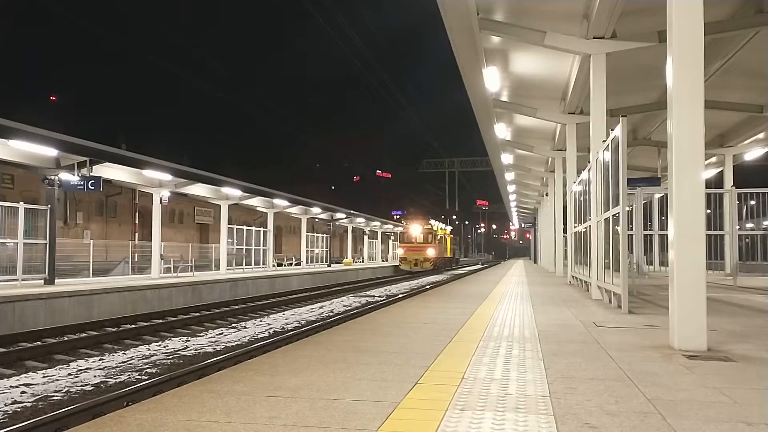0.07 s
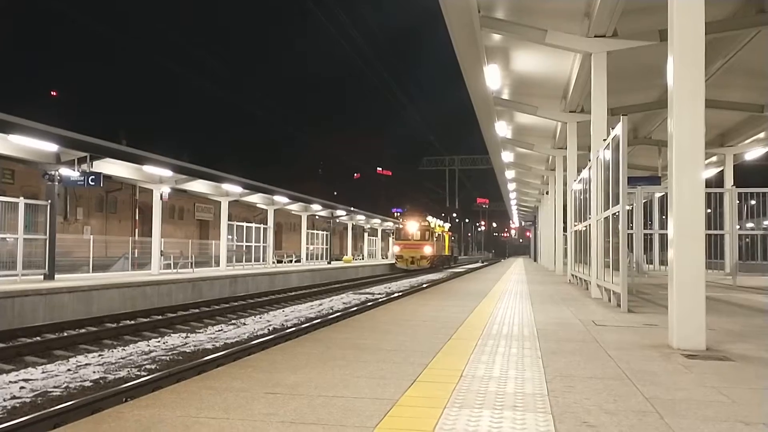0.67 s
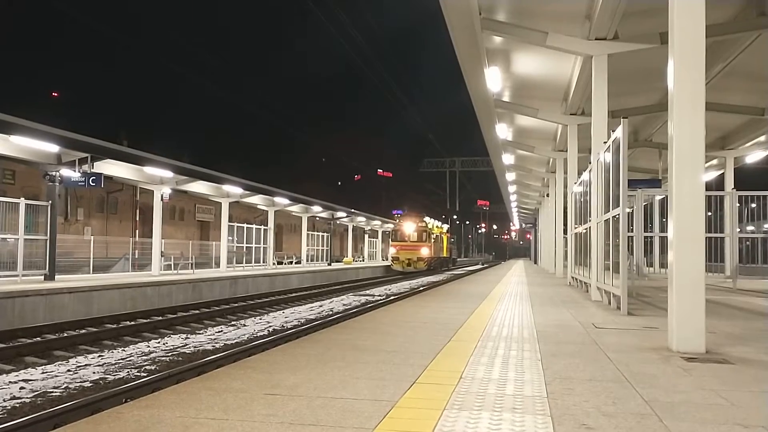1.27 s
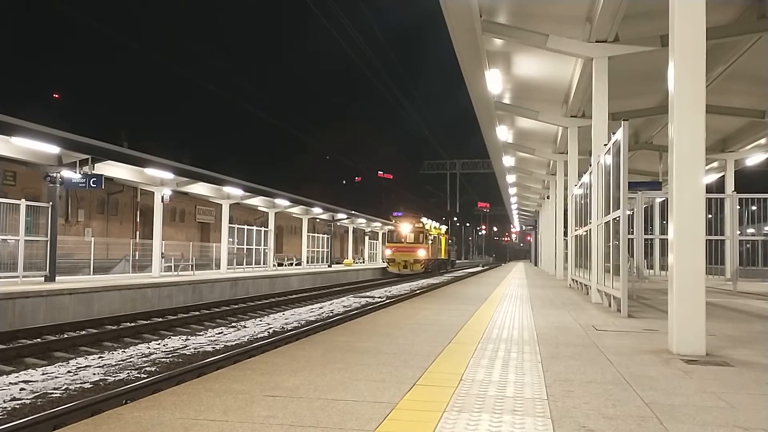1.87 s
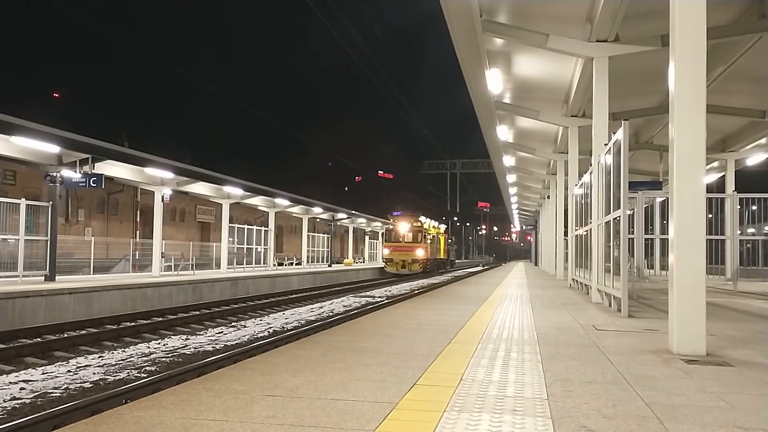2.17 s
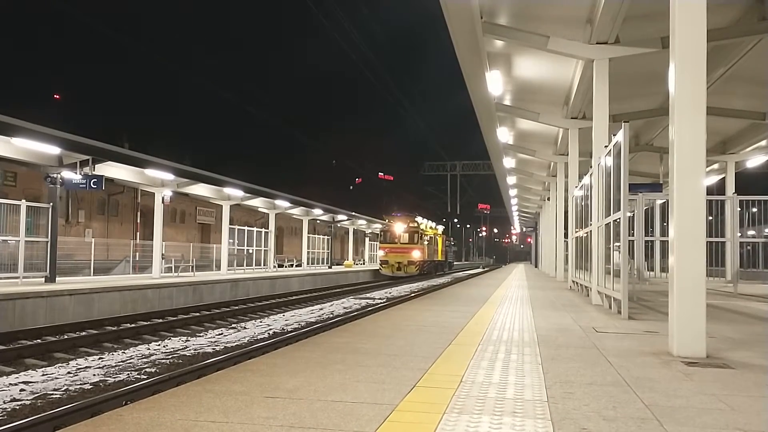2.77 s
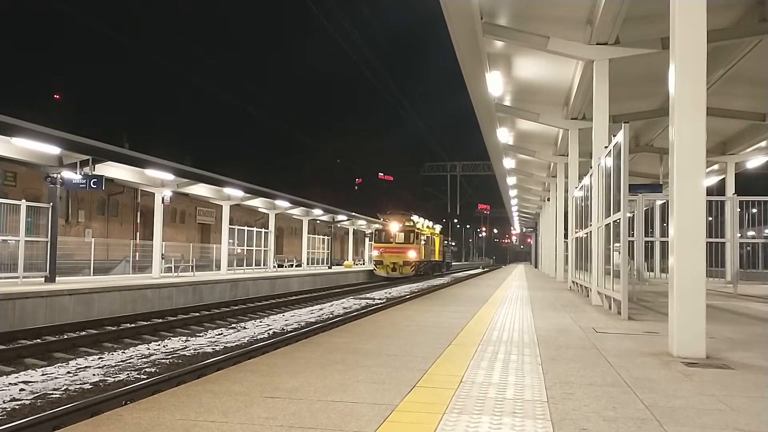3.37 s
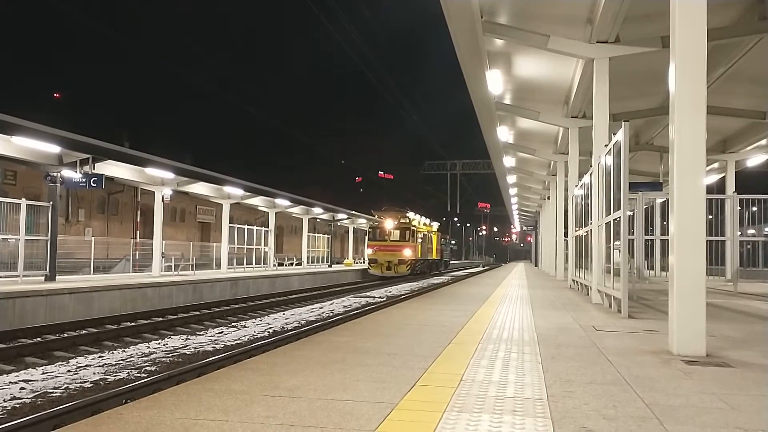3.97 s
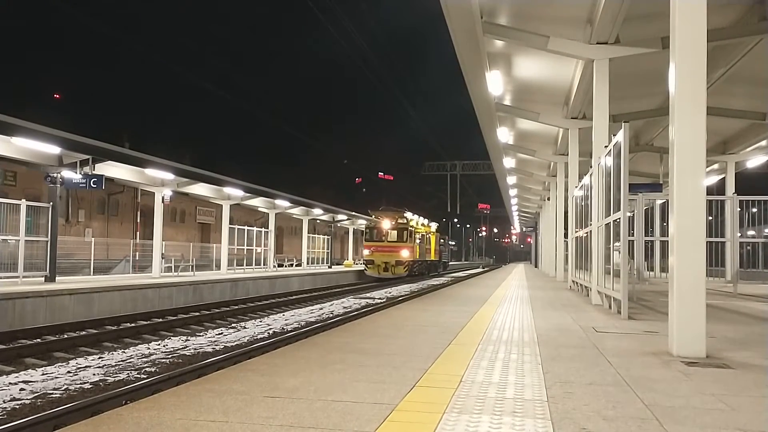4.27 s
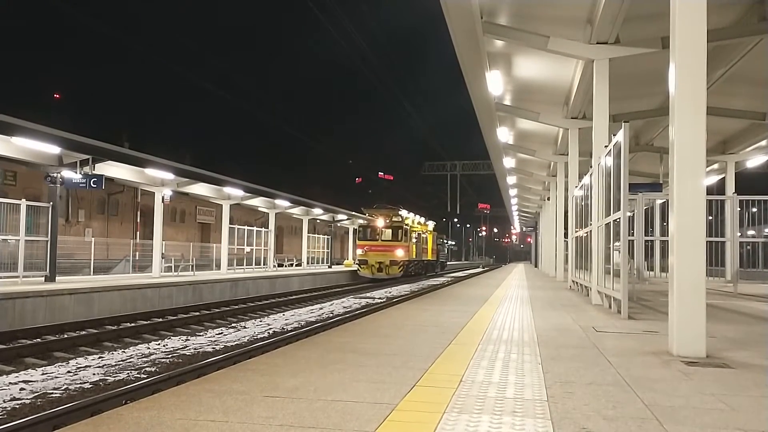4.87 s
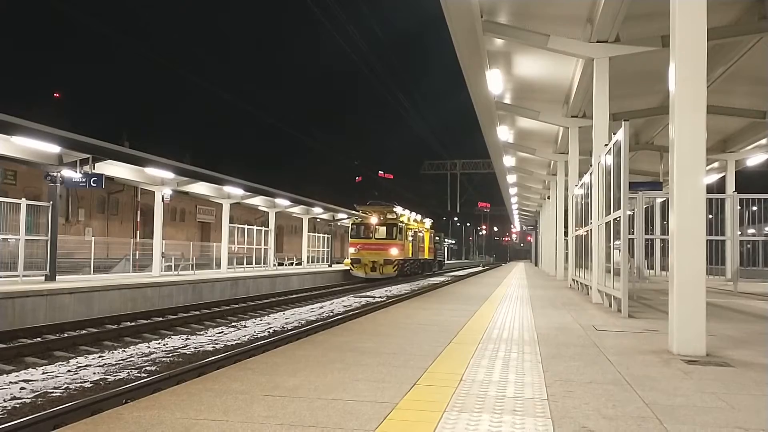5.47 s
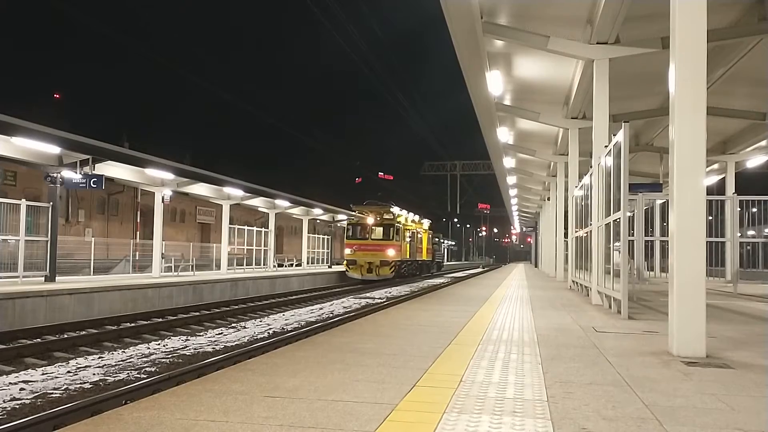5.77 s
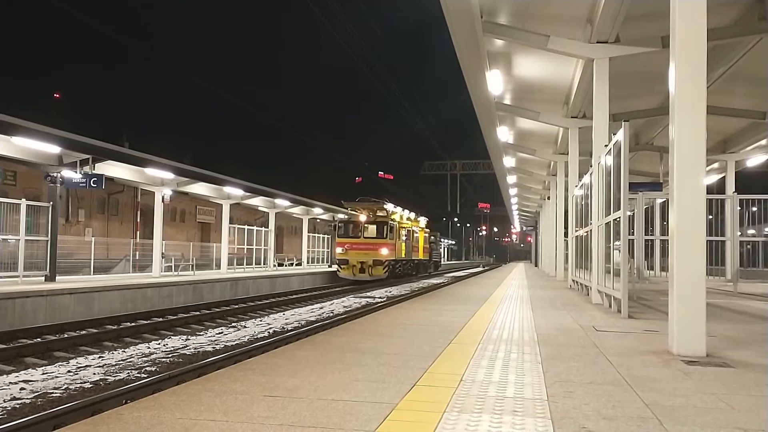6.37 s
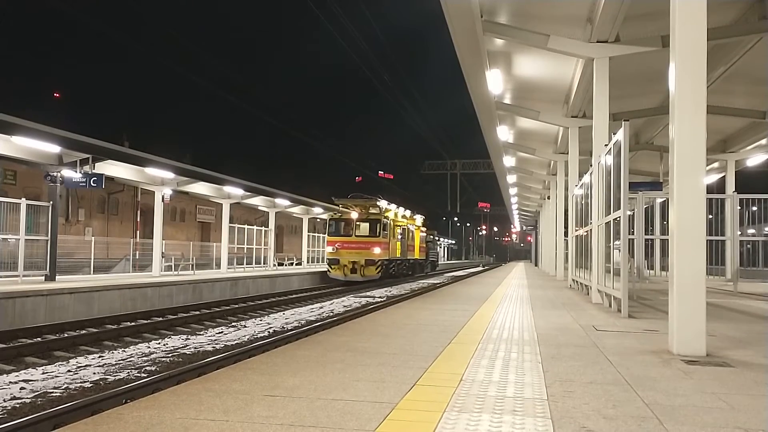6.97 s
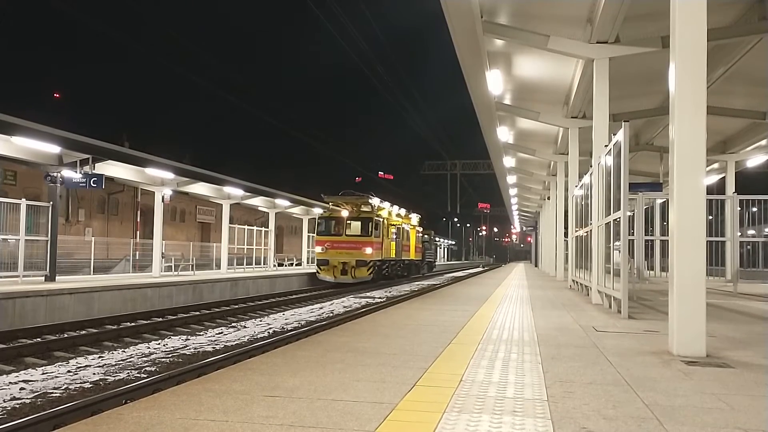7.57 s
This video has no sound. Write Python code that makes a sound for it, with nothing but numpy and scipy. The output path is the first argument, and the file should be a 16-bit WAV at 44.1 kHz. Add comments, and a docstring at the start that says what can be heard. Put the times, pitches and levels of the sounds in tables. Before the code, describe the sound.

From a roofed station platform, a diesel rail maintenance vehicle is heard approaching with a low, pulsing hum and rumble. The engine works harder for about two seconds, with small clanks from the running gear, then coasts while faint swishes and spits of hiss come and go. Past halfway, a loud hiss of released air builds and slowly drains away over the continuing throb. The bass is centred and the hiss spreads wide.

```python
"""A station platform at night: a diesel track maintenance vehicle rolls closer, pulling, then coasting.
Its engine beats against a second, slower machine in a deep throb, over rumble, clatter and exhaust drone.
The running gear knocks, and faint swishes and spits of hiss come and go. Then a valve lets out
a long jet of air that swells as it opens and sinks as the reservoir drains, under the platform roof."""
import sys
import numpy as np
from scipy import signal
from scipy.fft import rfft, irfft, next_fast_len
from scipy.io import wavfile
from scipy.ndimage import map_coordinates

SR = 44100
rng = np.random.default_rng(int(sys.argv[2]) if len(sys.argv) > 2 else 0)


def output_pcm(signal):
    """Save a mono or channel-first signal as 16-bit PCM at the path in sys.argv[1].

    Samples are clipped to [-1, 1] before scaling.
    """
    pcm = np.clip(np.atleast_2d(signal).T, -1, 1) * 32767
    wavfile.write(sys.argv[1], SR, np.round(pcm).astype(np.int16))


N = 340011

# The two deep hums; a negative echo turns the fade into a swell:
# (coasting level [dB], pull boost [dB], echo gain [ratio], fade time [s], fade period [s])
ENGINE_HUM = (-51, 10.5, 1.06, 1.47, 5)
AUXILIARY_HUM = (-50, 9, -0.14, 3.2, 5.5)
# Singing engine overtones: (multiple of the firing rate [ratio], then the five columns of a hum)
SINGING_TONES = [(6, -59, 6.6, 0.51, 3.51, 2.8), (7, -61.5, 11.2, 0.39, 1.61, 0.84)]
# Growl of the engine and the second machine: (multiple of its hum [ratio], relative level [dB])
ENGINE_OVERTONES = [(2, -8.5), (5, -17.5), (9, -15), (10, -15), (11, -18), (13, -21), (14, -21),
                    (16, -22.5)]
AUXILIARY_OVERTONES = [(2, -11), (2.5, -17), (4, -16.5)]
# Fader curve of the exhaust drone: (time [s], relative level [dB])
EXHAUST_FADER = [(0.32, -56), (0.4, -45.5), (0.85, -33.5), (1.36, -39), (1.5, -34.5), (1.79, -41),
                 (1.93, -36.5), (2.83, -59), (3.3, -46.5), (3.41, -64), (3.47, -49.5), (3.73, -48),
                 (3.88, -58.5), (4.2, -42.5), (5.12, -41), (6.39, -45.5), (6.55, -50.5), (7.66, -37.5)]
# Clanks of the running gear: (time [s], level [dB], ring [Hz])
GEAR_KNOCKS = [(1.122, -43, 2700), (1.231, -41.5, 2550), (1.402, -42, 2250), (1.475, -54, 2700),
               (7.315, -48, 2600)]
# Soft swells of hiss: (time [s], relative level [dB], half width [s])
HISS_SWELLS = [(.48, -63.5, .05), (1.043, -50, 0.078), (1.14, -46, 0.052), (1.36, -59, .05),
               (1.54, -61, 0.083), (2.035, -53, .055), (2.36, -64, 0.15), (2.73, -61.5, 0.047),
               (2.95, -64.5, 0.066), (3.34, -67.5, 0.048), (4.14, -66.5, .055), (4.48, -69.5, .05)]
# Spits of hiss: (time [s], relative level [dB], fall [s], low cut [Hz], high cut [Hz], pan left [dB])
HISS_SPITS = [(1.233, -39.5, 0.0058, 1500, 16000, -5), (1.365, -42, .002, 4000, 7000, 1),
              (1.403, -49.5, 0.011, 1200, 16000, -8), (1.665, -39.5, 0.0083, 2860, 12000, -4),
              (1.688, -50, .002, 4000, 14000, -1), (1.880, -45, 0.015, 6460, 16000, -8),
              (2.018, -31, 0.0015, 5000, 16000, -3), (2.864, -47.5, .011, 6960, 16000, -3),
              (3.014, -54, .017, 3000, 13000, -3), (3.233, -46, .008, 7000, 12500, 0),
              (3.251, -39, 0.0092, 5900, 11000, -3), (3.254, -48, 0.014, 2200, 5000, 3),
              (4.395, -61, .004, 4000, 14000, -6)]
# Tone colour of each noise layer: (frequency [Hz], relative level [dB])
RUMBLE_EQ = [(20, -36), (40, -15), (60, 0.5), (85, -3.5), (135, 0), (190, -1.5), (255, -4), (320, -1.5),
             (390, -4.5), (490, -9.5), (620, -7.5), (900, -29), (1500, -47)]
CLATTER_EQ = [(300, -11), (600, -6), (820, 0.5), (1150, -6.5), (1430, -2.5), (1620, -5), (1830, -4),
              (2150, -12), (2700, -14.5), (3300, -22.5), (5000, -28), (8000, -36), (16000, -56)]
JET_EQ = [(500, -28), (1000, -9.5), (1700, -3), (2300, -4.5), (2900, -0.5), (3500, -3.5), (4600, -3),
          (5800, -0.9), (7400, 1.0), (9500, -1.5), (10900, -2), (13000, -5), (15700, -7)]
CHUFF_EQ = [(1500, -16), (2600, 0), (4000, -3), (5500, -5), (9000, -8)]
SWISH_EQ = [(2000, -16), (4000, -10), (5500, -9.5), (6300, -4), (8000, -1), (10000, -3.5), (13000, -8),
            (16000, -13.5)]
SPIT_EQ = [(1000, 18.5), (4000, 1.5), (8000, 1), (12000, -2.5), (16000, 0)]
# Stereo image, centred bass and wide treble: (frequency [Hz], left-right correlation [-1 to 1])
STEREO_IMAGE = [(60, 1), (160, 0.92), (330, 0.91), (700, 0.42), (1300, -0.03), (3000, .03), (5500, 0.16),
                (9000, 0.068), (14000, -0.069)]

FIRING_HZ, AUXILIARY_HZ = 61.967, 52.775
START_DISTANCE_M, SPEED_M_PER_S = 68.6, 4.3
PULL_START_S, PULL_RISE_S, PULL_END_S, PULL_FALL_S = 0.14, 0.4, 1.98, 0.58
VALVE_OPENS_S = 4.784


def throb(in_step_s=2.435):
    """The hums of the engine and the second machine beat about nine times a second."""
    turn = 2 * np.pi * (clock() - in_step_s)
    engine_hum = echo_swell(*ENGINE_HUM) * unit(np.cos(FIRING_HZ * turn))
    auxiliary_hum = echo_swell(*AUXILIARY_HUM) * unit(np.cos(AUXILIARY_HZ * turn))
    return engine_hum + auxiliary_hum


def engine():
    """Growl, rumble and clatter follow the load; each firing gives the noise a slight push."""
    firing = np.cos(2 * np.pi * FIRING_HZ * clock())
    growl = overtones(FIRING_HZ, ENGINE_OVERTONES, scatter=0.63, rate=5)
    growl *= amp(drive_db(coasting_db=-49, pull_db=5.5))
    auxiliary = overtones(AUXILIARY_HZ, AUXILIARY_OVERTONES, scatter=0.58, rate=3)
    auxiliary *= amp(drive_db(coasting_db=-49, pull_db=7))
    rumble_db = drive_db(coasting_db=-48.4, pull_db=8.5) + 0.4 * wobble(8.9)
    rumble = amp(rumble_db) * stereo_noise(RUMBLE_EQ) * (1 + 0.055 * firing)
    clatter_db = drive_db(coasting_db=-54.01, pull_db=9) + 0.65 * wobble(30)
    clatter = amp(clatter_db) * stereo_noise(CLATTER_EQ) * (1 + 0.022 * firing)
    return growl + auxiliary + rumble + clatter


def drive_db(coasting_db, pull_db):
    """Level of an engine layer: up during the one pull, and creeping up as the vehicle nears."""
    t = clock()
    pull = np.clip(np.minimum((t - PULL_START_S) / PULL_RISE_S, 1 - (t - PULL_END_S) / PULL_FALL_S), 0, 1)
    return coasting_db + pull_db * pull - 20 * np.log10(1 - SPEED_M_PER_S * t / START_DISTANCE_M)


def echo_swell(coasting_db, pull_db, echo, fade_at_s, period_s):
    """Gain of a tone that swells and fades as its platform echo slips in and out of step."""
    slip = 2 * np.pi * (clock() - fade_at_s) / period_s
    return amp(drive_db(coasting_db, pull_db)) * np.abs(1 - echo * np.exp(1j * slip))


def exhaust(start_hz=164.05, rise_hz_per_s=0.11, trim_db=-0.8):
    """A nearly pure drone: strong during the pull, it drops away and then builds again."""
    level_db = np.interp(clock(), *np.transpose(EXHAUST_FADER)) + trim_db
    phase = 2 * np.pi * np.cumsum(start_hz + rise_hz_per_s * clock()) / SR
    return amp(level_db) * unit(np.sin(phase + 0.033 * wobble(9)))


def air_jet(edge_hz=2250, edge_octaves=0.35, shelf_db=19.5, shelf_lag_s=0.11, attack_s=0.039):
    """Hiss of air, thin when quiet and fuller when loud."""
    level_db = jet_level_db()
    hz, t, spectrum = signal.stft(stereo_noise(JET_EQ), SR, nperseg=512)
    below_peak_db = level_db.max() - np.interp(t, clock(), level_db)
    lagged_db = np.interp(t - shelf_lag_s, t, below_peak_db)
    # A low-shelf cut slides upwards as the level falls, by 1.5 octaves at most.
    edge = np.log2(edge_hz) + np.minimum(np.abs(lagged_db / 14) ** 1.72, 1.5)
    low_band = (1 + np.tanh((edge - np.log2(hz + 1)[:, None]) / (2 * edge_octaves))) / 2
    # The top fizz starts dull and takes a moment to come in.
    fizz_band = along([(8000, 0), (15000, 1)], hz)[:, None]
    fizz_cut_db = 19 * np.exp(-np.abs(t - VALVE_OPENS_S) / 0.16) - 0.02 * below_peak_db
    spectrum *= amp(-shelf_db * low_band - fizz_cut_db * fizz_band)
    jet = signal.istft(spectrum, SR, nperseg=512)[1][:, :N]
    attack = np.clip((clock() - VALVE_OPENS_S) / attack_s, 0, 1)
    return jet * attack * amp(level_db + 0.47 * wobble(30))


def jet_level_db(peak_db=-21.94, rise_db_per_s=15.5, crack_s=0.045, travel_s=0.98, drain_s=0.53):
    """Envelope of the jet: the valve cracks and opens steadily, then the reservoir drains."""
    age = np.maximum(clock() - VALVE_OPENS_S, 1 / SR)
    cracked = 1 - np.exp(-age / crack_s)
    throttle_db = rise_db_per_s * np.maximum(travel_s - age, 0)
    pressure = (1 + np.maximum(age - travel_s, 0) / drain_s) ** -1.31
    return peak_db - throttle_db + 10 * np.log10(cracked) + 20 * np.log10(pressure)


def valve_chuff(level_db=-54, attack_s=0.012, t60_s=2.4):
    """The valve unseats with an abrupt, mid-pitched puff that the jet soon covers."""
    age = clock() - VALVE_OPENS_S
    attack = np.clip(age / attack_s, 0, 1)
    return amp(level_db - 60 * np.abs(age) / t60_s) * attack * stereo_noise(CHUFF_EQ)


def singing():
    """The sixth and seventh engine harmonics swell and fade as the vehicle moves along."""
    return sum(echo_swell(*swell) * overtones(FIRING_HZ, [(multiple, 0)], scatter=0.087, rate=6)
               for multiple, *swell in SINGING_TONES)


def knocks(t60_s=0.083):
    """The running gear clanks: each hit is a band of metal resonance that dies quickly."""
    out = np.zeros((2, N))
    for at_s, db, hz in GEAR_KNOCKS:
        age = clock() - at_s
        ring = stereo_noise([(hz / 2, -30), (hz * 0.64, -10), (hz, 0), (hz * 1.31, -15), (hz * 2, -40)])
        out += amp(db - 60 * np.abs(age) / t60_s) * (age > 0) * ring
    return out


def swishes(floor_db=-74.5, trim_db=-3):
    """A thin, fluttering hiss comes and goes a little to the right."""
    swell_power = sum(amp(db) ** 2 * np.exp(-((clock() - at_s) / width_s) ** 2 / 2)
                      for at_s, db, width_s in HISS_SWELLS)
    level_db = 10 * np.log10(amp(floor_db) ** 2 + swell_power) + trim_db
    return amp(level_db + 0.6 * wobble(40)) * pan(-2.6) * stereo_noise(SWISH_EQ)


def spits(rise_to_fall=0.43, trim_db=8):
    """Short, sharply peaked bursts of crackly hiss, each in its own band."""
    out = np.zeros((2, N))
    crackle = unit(stereo_noise(SPIT_EQ) * amp(3.4 * wobble(900)))
    for at_s, db, fall_s, low_hz, high_hz, left_db in HISS_SPITS:
        age = (clock() - at_s) / fall_s
        envelope = np.exp(-np.maximum(age, -age / rise_to_fall) ** 1.46 / 2)
        spit = amp(db + trim_db) * pan(left_db) * envelope * crackle
        out += filtered(spit, lambda hz: (1 - 1 / (1 + (hz / low_hz) ** 6)) / (1 + (hz / high_hz) ** 8))
    return out


def roof_echoes(air, echo_gain=0.035, count=14):
    """Roof, pillars and platform add weak early echoes that comb the hiss, differently at each ear."""
    out = air.copy()
    for ear in range(2):
        for delay_s in rng.uniform(0.001, 0.03, count):
            lag = int(delay_s * SR) + 1
            out[ear, lag:] += echo_gain * air[ear, :-lag]
    lean = [(3000, 0.16), (6000, -0.55), (9500, 0.8), (14000, -1.1)]  # (frequency [Hz], left boost [dB])
    return filtered(out, lambda hz: amp(along(lean, hz) * np.array([[1], [-1]])))


def overtones(hz, table, scatter, rate):
    """Multiples of a shaft rate; shifting reflections blur them, the high ones differently at each ear."""
    out = np.zeros((2, N))
    for multiple, db in table:
        phase = 2 * np.pi * (multiple * hz * clock() + rng.random())
        spread = stereo_angle(multiple * hz) * wobble(rate)
        blur = scatter * wobble(rate)
        waver = 1 + scatter * wobble(rate)
        out += amp(db) * unit(waver * np.sin(phase + blur + np.array([spread, -spread])))
    return out


def stereo_noise(eq):
    """Coloured noise with a mid channel of rms 1, centred in the bass and diffuse in the treble."""
    def response(hz):
        angle = stereo_angle(hz)
        return amp(along(eq, hz)) * np.array([np.cos(angle), np.sin(angle)])
    mid, side = filtered(rng.standard_normal((2, N)), response)
    return np.array([mid + side, mid - side]) / np.std(mid)


def stereo_angle(hz):
    """Width as a mid-side angle in radians; zero is mono."""
    return np.arccos(np.clip(along(STEREO_IMAGE, hz), -1, 1)) / 2


def pan(left_db):
    """Two gains that put the left channel left_db above the right."""
    return amp(left_db * np.array([[0.5], [-0.5]]))


def filtered(x, response):
    """Equalise x with a gain given as a function of frequency."""
    size = next_fast_len(N + SR // 4)
    return irfft(rfft(x, size) * response(np.fft.rfftfreq(size, 1 / SR)), size)[..., :N]


def wobble(rate):
    """A smooth random curve with rate knots a second."""
    return map_coordinates(rng.standard_normal(int(N * rate / SR) + 4), [clock() * rate])


def along(points, hz):
    """Read (frequency [Hz], value) points on a log axis."""
    knots_hz, values = np.transpose(points)
    return np.interp(np.log(hz + 1), np.log(knots_hz + 1), values)


def amp(db):
    """Decibels to gain."""
    return 10 ** (np.asarray(db) / 20)


def unit(x):
    """Scale to rms 1."""
    return x / np.sqrt(np.mean(x ** 2) + 1e-20)


def clock():
    """The time of each sample in seconds."""
    return np.arange(N) / SR


def scene():
    """The mix from the platform: vehicle, faint hiss, and the air release under the roof."""
    vehicle = throb() + exhaust() + engine() + singing() + knocks()
    return vehicle + swishes() + spits() + roof_echoes(valve_chuff() + air_jet())


def record(dry, start_s=0.2834, fade_s=0.015, top_hz=15920, skirt_hz=220):
    """A moment of silence, a quick fade-in and a steep high cut."""
    fade = 1 - np.exp(-np.maximum(clock() - start_s, 0) / fade_s)
    return filtered(dry * fade, lambda hz: np.clip((top_hz - hz) / skirt_hz, 0, 1))


dry = scene()
out = record(dry)
output_pcm(out)
```